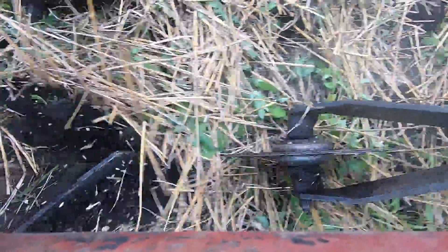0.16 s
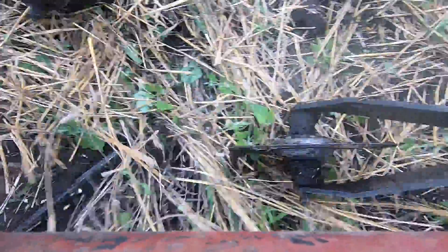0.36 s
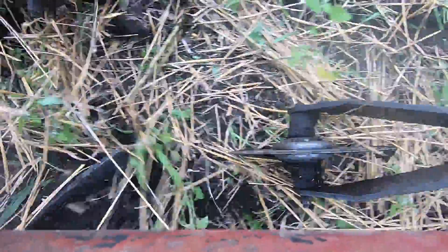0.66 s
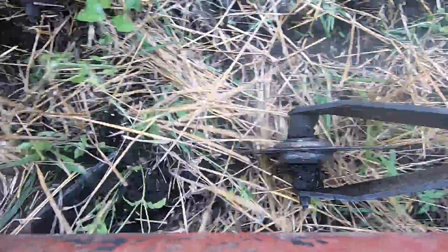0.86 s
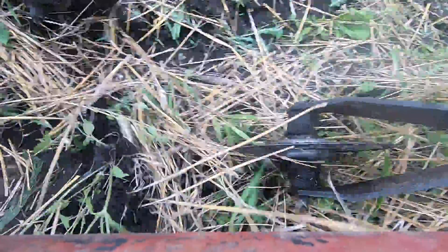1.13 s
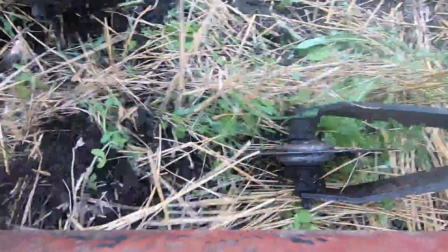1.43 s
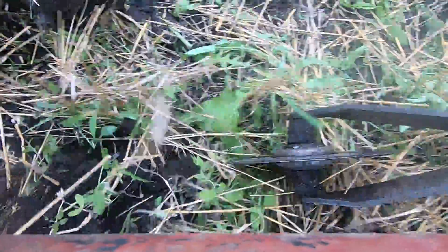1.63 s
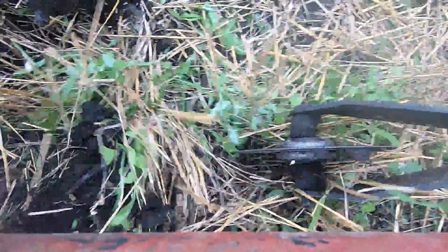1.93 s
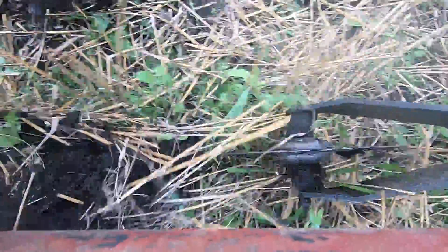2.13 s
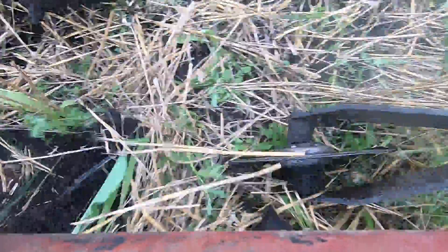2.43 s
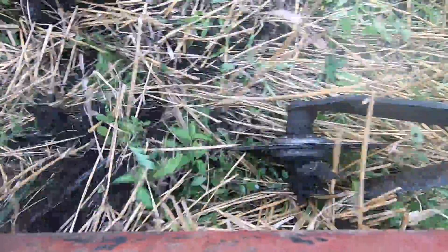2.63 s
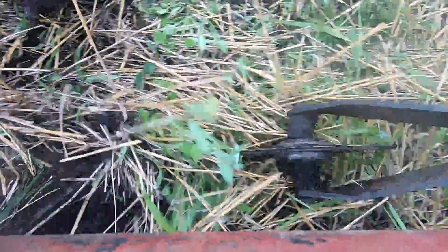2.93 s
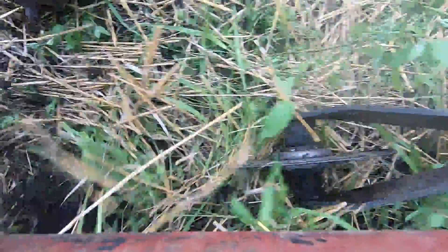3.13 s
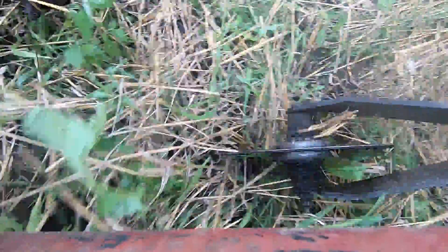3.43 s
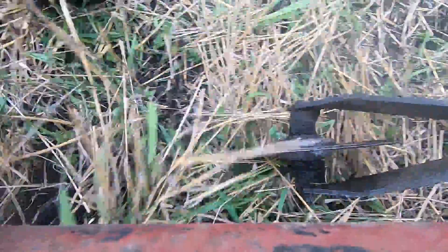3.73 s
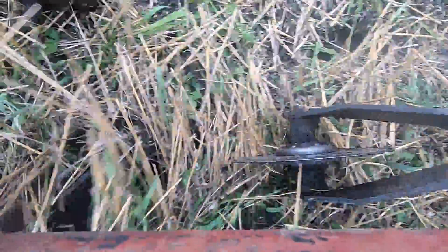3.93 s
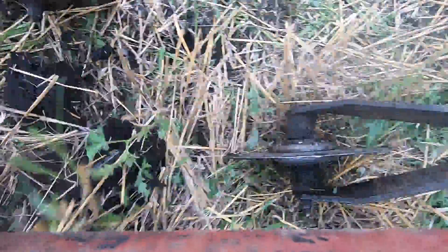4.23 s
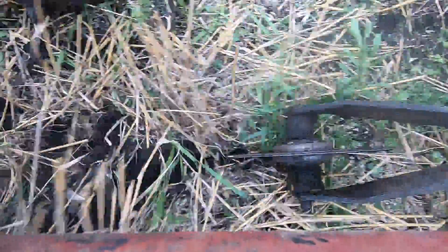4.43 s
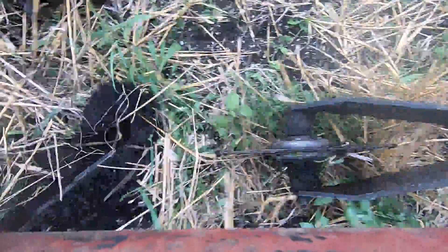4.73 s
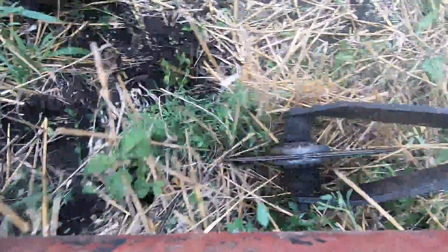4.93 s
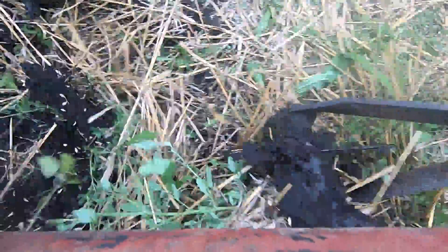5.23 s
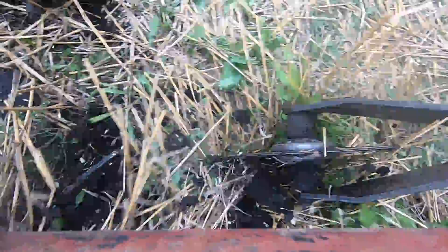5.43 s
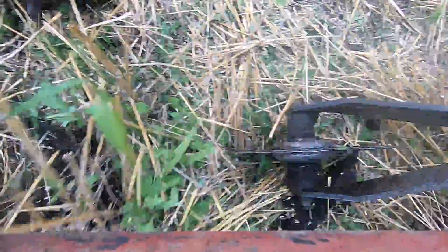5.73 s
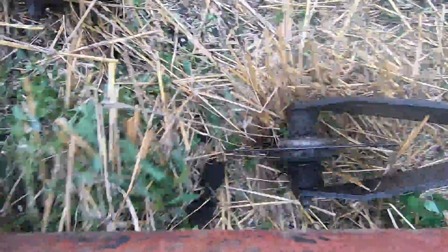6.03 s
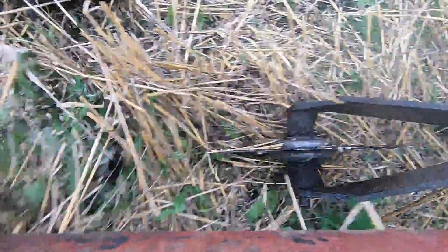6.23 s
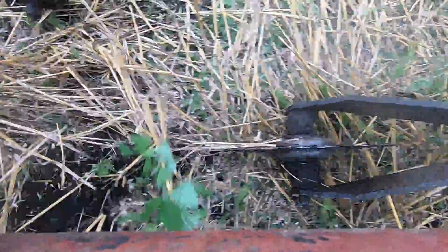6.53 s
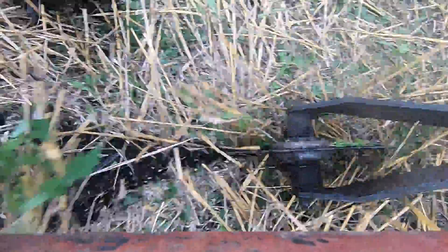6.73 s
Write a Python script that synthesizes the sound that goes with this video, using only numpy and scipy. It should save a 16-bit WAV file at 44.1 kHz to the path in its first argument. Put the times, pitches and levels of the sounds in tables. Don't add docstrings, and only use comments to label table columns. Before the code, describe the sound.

Outdoors in a stubble field, heard from right beside the plough disc: a loud low engine boom under load dominates, with rapid knocking and faint whine. Earth hisses and grinds past the share, roughest at the start and near the end. Metallic clod knocks come throughout, the strongest just before two seconds; dry stalks crack and tick, and dull stone thuds jolt the frame, hardest after five seconds.

```python
import sys
import numpy as np
from scipy import signal
from scipy.io import wavfile
from scipy.ndimage import uniform_filter1d, minimum_filter1d

SR = 44100
rng = np.random.default_rng(int(sys.argv[2]) if len(sys.argv) > 2 else 0)


def int16_out(signal):
    q = np.round(np.clip(np.atleast_2d(signal).T, -1, 1) * 32767)
    wavfile.write(sys.argv[1], SR, q.astype(np.int16))


def magnitude_from_level(level_db):
    exponent = np.asarray(level_db, float) / 20
    return 10 ** exponent


N = 302526
TIME = np.arange(N) / SR


def evened(x):
    return x / np.sqrt(np.mean(x ** 2) + 1e-20)


def curves(rows):
    s, *columns = np.transpose(rows)
    return [np.interp(TIME, s, c) for c in columns]


def bumps(rows):
    s, length, db = np.transpose(rows)[..., None]
    t = TIME[::128]
    shape = np.cos(np.pi * np.clip((t - s) / length, -.5, .5)) ** 2
    return np.interp(TIME, t, (db * shape).sum(0))


def read(points, hz):
    f, value = np.transpose(points)
    return np.interp(np.log(hz + 1), np.log(f + 1), value)


def resonate(x, hz, width):
    return signal.lfilter(*signal.iirpeak(hz, hz / width, SR), x)


def band(x, lo_hz, hi_hz):
    return signal.sosfilt(signal.butter(4, [lo_hz, hi_hz], "bandpass", fs=SR, output="sos"), x)


def drift(per_s):
    t = TIME[::128]
    hz = np.geomspace(per_s / 12, per_s, num=16)[:, None]
    waves = np.sin(2 * np.pi * (hz * t + rng.random(hz.shape))).sum(0)
    return np.interp(TIME, t, evened(waves))


def noise(colour, size, patchy_db, flicker_db):
    frames, hz = 4 * N // size + 5, np.fft.rfftfreq(size, 1 / SR)
    a, b, patches, flicker = rng.standard_normal((frames, len(hz), 4), np.float32).T
    patches = evened(uniform_filter1d(uniform_filter1d(patches, size=6, axis=0), size=16, axis=1))
    flicker = evened(uniform_filter1d(flicker, size=60, axis=0))
    level_db = read(colour, hz)[:, None] + patchy_db * patches + flicker_db * flicker
    z = (a + 1j * b) * magnitude_from_level(level_db)
    return evened(signal.istft(z, nperseg=size, noverlap=3 * size // 4)[1][:N])


def sparse_blows(per_s, spread_db):
    sizes = magnitude_from_level(spread_db * np.minimum(rng.exponential(1, N), 4))
    return sizes * (rng.random(N) < per_s / SR) * rng.choice([-1, 1], N)


# time in seconds, speed in rpm.
SPEED = [(0.0, 1678.8), (0.5, 1754.3), (0.95, 1704.8), (1.11, 1687.3), (1.53, 1692.5), (1.92, 1647.1),
         (2.36, 1633.2), (2.58, 1672.9), (3.05, 1683.1), (3.91, 1639.7), (4.22, 1656.7), (4.38, 1641.6),
         (4.92, 1594.8), (5.33, 1607.0), (5.69, 1630.2), (6.17, 1619.0), (6.34, 1609.5), (6.86, 1596.0)]


def engine_cycle():
    return .0063 + np.cumsum(curves(SPEED)[0] / 120) / SR


# strength in dB, lag from the manifold length in firing periods.
CYLINDERS = [(.6, -.011), (.8, -.037), (.6, -.029), (0, 0), (-1.3, .048), (-.9, .044)]
# multiple of the engine cycle, level in dB rms.
ORDER_DB = [(1, -57), (2, -51), (3, -79), (9, -38.5), (10, -36.5), (11, -40.5), (12, -47.5), (13, -43),
            (14, -50.5), (15, -49), (16, -69), (17, -46.5), (18, -49.5), (19, -74)]
# middle in seconds, length in seconds, change in dB.
SAGS = [
    (1.52, 0.44, -1.8),
    (2.08, 0.6, -1.6),
    (2.82, 0.71, -2),
    (5.42, .25, -1.5),
]


def exhaust(cycle):
    count = len(CYLINDERS)
    smooth = signal.resample(np.array(CYLINDERS), 32 * count).T
    strength_db, lag = (np.interp(cycle, np.arange(len(c)) / len(c), c, period=1) for c in smooth)
    boom_db = -13 + bumps(SAGS) + strength_db + 0.059 * drift(29)
    boom = magnitude_from_level(boom_db) * np.cos(2 * np.pi * (count * cycle + lag))
    orders = sum(magnitude_from_level(db) * np.cos(2 * np.pi * (k * cycle + rng.random())) for k, db in ORDER_DB)
    return np.sqrt(2) * (boom + magnitude_from_level(1.3 * drift(4.2)) * orders)


# place as a share of the cycle, level in dB.
KNOCKS = [(.035, 0), (.197, -10), (.357, -6.5), (.438, -9), (.596, -7.5), (.752, -16), (.826, -3.5),
          (.972, -6)]
# frequency in Hz, width in Hz, level in dB.
BLOCK = [(585.6, 95, -3), (633, 82, 0), (443, 44, -8.5)]


def block(cycle, bite_db):
    blows = np.zeros(N)
    chance = rng.standard_normal((int(cycle[-1]) + 1, len(KNOCKS), 2))
    for k, (place, db) in enumerate(KNOCKS):
        at = np.searchsorted(cycle, np.arange(len(chance)) + place + .0015 * chance[:, k, 0])
        blows[np.minimum(at, N - 1)] += magnitude_from_level(db + 1.4 * chance[:, k, 1])
    drive = evened(blows) + .18 * rng.standard_normal(N)
    ring = sum(magnitude_from_level(db) * resonate(resonate(drive, hz, w), hz, w) for hz, w, db in BLOCK)
    return magnitude_from_level(-34.5 + 0.77 * bite_db - 4.0) * evened(ring)


# multiple of the engine cycle, frequency in Hz of the panel it excites,
# width in Hz, level in dB on resonance.
GEARS = [(20.7, 277.3, 4.5, -43.5), (64.6, 941, 22, -46), (120, 1618, 55, -51), (112, 1540, 60, -60)]
# middle in seconds, length in seconds, change of whine in dB.
MESH = [
    (.58, 0.44, 3),
    (4.65, .35, -3.5),
    (5.0, .4, 3),
    (5.35, 0.91, -10),
    (5.9, 0.53, 3),
    (6.35, 0.51, 3),
    (6.85, .3, -4),
]


def gears(cycle):
    rate = np.gradient(cycle) * SR
    whine = 0
    for k, hz, width, db in GEARS:
        off_resonance = 1 + (2 * (k * rate - hz) / width) ** 2
        tone = np.sqrt(2) * np.cos(2 * np.pi * k * cycle)
        whine = whine + magnitude_from_level(db + 2.2 * drift(40)) * tone / off_resonance
    return magnitude_from_level(bumps(MESH)) * whine


# frequency in Hz, level in dB per Hz.
SHAKE = [(15, -26.5), (30, -21), (50, -6), (62, 5.5), (72, -4), (125, -4), (170, -33.5), (250, -46),
         (500, -100)]
# frequency in Hz, level in dB per Hz.
DRUMMING = [(50, -70), (100, -19), (150, -1), (200, -0.5), (250, 3.5), (300, -8), (370, -18.5),
            (600, -39.5), (1500, -89.5)]
# middle in seconds, length in seconds, change of drumming in dB.
LEANS = [
    (.6, 0.34, -11),
    (1.08, 0.35, -11.5),
    (1.68, 0.37, -13.5),
    (2.2, 0.51, 6.5),
    (2.8, .25, 2),
    (4.2, 0.99, -5),
    (5.05, 0.47, 2.5),
    (5.5, 0.8, 5.5),
    (6.3, 0.94, 6.5),
    (6.75, 0.35, 5.5),
]
# time in seconds, peak in dB, ring in Hz, treble in dB.
THUDS = [
    (1.401, -32, 213, 6),
    (1.864, -26, 223, 6.5),
    (2.628, -20.5, 193, -8),
    (3.487, -19.5, 206, -16),
    (3.925, -19.5, 238, -15),
    (5.305, -17.5, 260, -11),
    (5.381, -27, 250, 0),
    (5.406, -21.5, 240, -16),
    (6.068, -30.5, 180, -16),
]


def frame(bite_db):
    shake = noise(SHAKE, size=2048, patchy_db=1.2, flicker_db=1.2)
    drumming = noise(DRUMMING, size=1024, patchy_db=1.2, flicker_db=1.5)
    jolt_s = 0.051
    jolts = sum(magnitude_from_level(db) * np.exp(-abs(TIME - s) / jolt_s) for s, db, *_ in THUDS)
    shake_gain = magnitude_from_level(-30.5 + 2 * drift(2.8)) + magnitude_from_level(-10.5) * jolts
    drum_gain = magnitude_from_level(-37 + 0.75 * bite_db - 3.0 + bumps(LEANS)) + magnitude_from_level(-20) * jolts
    return shake_gain * shake + drum_gain * drumming


# frequency in Hz, level in dB per Hz.
ROAR = [(180, -48.5), (300, -10.5), (400, -12.5), (640, -8.5), (1050, -15.5), (1600, -14.5), (1870, -18.5),
        (3940, -22.5), (6570, -37.5), (7500, -34), (8500, -39), (11100, -51), (13100, -65.5), (15500, -84)]
# time in seconds, dB about the mean.
STUBBLE = [(0, -2), (.3, -1), (.45, 2), (1.4, -0.5), (2.05, 3), (2.3, 0), (2.55, 3), (3.2, 1.5), (3.4, 0.5),
           (3.8, 1.7), (4.2, -1), (4.4, -.6), (4.7, -0.5), (5.3, 3.5), (5.55, 2.5), (5.7, 1.5), (6.1, 3),
           (6.86, 0)]
# middle in seconds, length in seconds, lift of the fizz in dB.
BUNCHES = [(.1, .5, 8.5), (.37, .5, 14), (.73, .3, 4.5), (1.3, .5, 4), (4.15, 0.37, -0.5), (4.53, .2, 8.5),
           (5.0, .6, 9), (5.25, 0.45, 10.5), (6.05, 0.61, 7), (6.4, 0.55, 7), (6.75, 0.55, 9)]


def soil(bite_db):
    stubble_db = curves(STUBBLE)[0]
    rush = noise(ROAR, size=256, patchy_db=1.88, flicker_db=0.97)
    crumbs = signal.lfilter([1], [1, -.7], sparse_blows(per_s=500, spread_db=5.5))
    rush = rush + magnitude_from_level(-22.5) * evened(band(crumbs, 960, 5000))
    dull = signal.sosfiltfilt(signal.butter(2, 3000, fs=SR, output="sos"), rush)
    scrape = rush - dull
    fizz = evened(band(rng.standard_normal(N) * magnitude_from_level(1.9 * drift(60)), 11200, 14400))
    rush_db = -41 + .2 * bite_db + .4 * stubble_db + 1.5
    scrape_db = -46.5 + stubble_db + 8.5
    fizz_db = -81 + bumps(BUNCHES) + 2.0
    return magnitude_from_level(rush_db) * dull + magnitude_from_level(scrape_db) * scrape + magnitude_from_level(fizz_db) * fizz


# middle in seconds, length in seconds, lift in dB.
HEAVY = [
    (0, 0.51, 11.5),
    (.3, 0.54, 6),
    (3.88, .3, 6),
    (5.2, 1, 3),
    (5.6, 0.48, 4.5),
    (6.06, 0.72, 12),
    (6.75, 1, 8.5),
]


def share(bite_db):
    slips = sparse_blows(per_s=1500, spread_db=3.5)
    board = sum(resonate(resonate(slips, hz, 75), hz, 75) for hz in (538, 583))
    board = board + magnitude_from_level(-10) * band(slips, 690, 930)
    return magnitude_from_level(-44 + 0.81 * bite_db + bumps(HEAVY) - 2.0) * evened(board)


def hits(rows, ring_width, body_hz, treble_hz, rise_s, t60, lift_db, crack_db):
    out, t = np.zeros(N + 4096), np.arange(4096) / SR
    crack_t60 = 0.0059
    decay = magnitude_from_level(-60 * t / t60) + magnitude_from_level(crack_db - 60 * t / crack_t60)
    envelope = decay * (1 - np.exp(-t / rise_s))
    for s, db, hz, treble_db in rows:
        burst = rng.standard_normal(len(t)) * envelope
        mode = resonate(resonate(burst, hz, ring_width), hz, ring_width)
        low = evened(mode) + evened(band(burst, *body_hz))
        high = band(burst, *treble_hz)
        sound = low / abs(low).max() + magnitude_from_level(treble_db) * high / abs(high).max()
        out[round((s - rise_s) * SR):][:len(t)] += magnitude_from_level(db + lift_db) * sound
    return out[:N]


# time in seconds, peak in dB, ring in Hz, treble in dB.
CLANKS = [(0.179, -27, 1220, -33), (0.385, -23, 1310, -24), (0.4165, -24, 1520, -24),
          (0.562, -27.5, 910, 0), (0.852, -24, 1110, -20), (1.4068, -24.5, 1180, -26),
          (1.4398, -27.5, 1495, -11), (1.5727, -26.5, 1640, -25), (1.5938, -28.5, 1404, -6),
          (1.859, -21.5, 1410, -28), (1.912, -14.5, 1430, -22), (2.1849, -20.5, 1060, -18),
          (2.223, -26, 1980, -7), (2.3473, -23, 1350, -10), (2.488, -22, 1300, -9),
          (2.6306, -22.5, 1460, -16), (3.0546, -31, 1210, -9), (3.345, -25, 940, -26),
          (3.4876, -23.5, 1080, -24), (3.647, -23, 1300, -20), (3.9075, -22.5, 1480, -27),
          (3.949, -23, 1390, -14), (4.5511, -20, 1685, -7), (5.2908, -22, 1160, -16),
          (5.507, -30, 1170, -2), (5.7156, -29, 990, -17), (6.0432, -23.5, 1270, -13),
          (6.108, -27, 997, -10), (6.1613, -26.5, 1350, -19), (6.597, -30, 915, -23)]
# time in seconds, peak in dB, ring in Hz, treble in dB.
SCRAPES = [(0.487, -22, 920, -11), (1.478, -24, 3600, -8), (1.862, -24, 1250, -22),
           (1.902, -20.5, 1110, -15), (1.9656, -27, 1480, -19), (1.984, -26, 2200, -15),
           (1.999, -22, 1480, -11), (2.107, -30, 2100, -1), (3.405, -23, 1000, -22), (3.425, -26, 1750, -8),
           (4.9782, -26, 1100, -11), (5.2762, -22, 1270, -12), (5.281, -30, 1160, -5),
           (6.028, -33, 1060, 5)]


def clods():
    return (hits(CLANKS, 240, (600, 2800), (2600, 5500), .003, 0.059, -2.2, -3)
            + hits(SCRAPES, 550, (600, 2800), (2600, 5500), .005, 0.1, -4.8, -13))


# time in seconds, peak in dB, ring in Hz, treble in dB.
SNAPS = [(0.5601, -28, 4220, -10), (0.7362, -30, 3930, -15), (0.7552, -27, 3930, -15),
         (0.8395, -28.5, 4700, -23), (1.0141, -31, 4800, -15), (2.2209, -38, 3470, -23),
         (2.3136, -37, 3660, -16), (2.3445, -19, 3720, -15.5), (2.4867, -34, 3220, -23),
         (3.1946, -29.5, 3800, -25), (3.4236, -35.5, 3100, -7), (3.7274, -30, 3050, -24),
         (3.8477, -38, 3960, -4), (3.9459, -30, 4000, -24), (4.0357, -33, 4000, -18),
         (4.5191, -32, 3860, -16), (4.5516, -22, 3800, -4.5), (4.9182, -27.5, 3670, -10),
         (5.1173, -29, 4170, -13), (5.465, -29.5, 3560, -22), (5.6695, -31, 3700, -16),
         (5.7158, -23, 4620, -16), (6.0062, -27, 3220, -16)]
# time in seconds, peak in dB, ring in Hz, treble in dB.
TICKS = [
    (0.7624, -32, 3940, -19),
    (4.934, -26.5, 3640, -11),
    (5.7048, -23.5, 4280, -22),
    (5.849, -27, 4560, -6),
    (5.8612, -21, 4180, -11),
    (5.915, -33, 3000, -14),
    (6.1514, -29.5, 3800, -6),
    (6.1914, -32.5, 4190, -3),
]


def straw():
    return (hits(SNAPS, 390, (3000, 6000), (6800, 9800), 0.0004, 0.065, -2.8, 14)
            + hits(TICKS, 520, (3000, 6000), (6800, 8800), 0.00049, 0.04, -4.5, 9.6))


def stones():
    return hits(THUDS, 100, (150, 340), (420, 1100), .003, 0.078, -3.0, -9)


# time in seconds, dB about the mean pull.
BITE = [(0, 0), (.42, 4.5), (.56, -2), (1.25, 1.5), (1.7, -2), (1.9, 1), (2.1, -2), (3.0, -3), (3.4, 0.5),
        (4.1, -5.5), (4.45, 3.5), (5.25, 4.5), (5.5, -1), (5.8, 0), (6.08, -2.5), (6.3, -0.5), (6.86, 0.5)]


def scene():
    cycle = engine_cycle()
    bite_db = curves(BITE)[0]
    engine = exhaust(cycle) + block(cycle, bite_db) + gears(cycle)
    plough = frame(bite_db) + soil(bite_db) + share(bite_db)
    return (engine + plough + clods() + straw() + stones())[None]


def roll_off(x):
    return signal.sosfilt(signal.butter(12, 15710, fs=SR, output="sos"), x)


# frequency in Hz, width in Hz, lift in dB.
HOUSING = [(7750, 1300, 3), (8980, 350, -9), (9550, 500, 3), (10200, 600, -8), (10950, 700, 5)]


def record(dry):
    wet = dry + sum((magnitude_from_level(db) - 1) * resonate(dry, hz, w) for hz, w, db in HOUSING)
    room_left = np.minimum(magnitude_from_level(-6.7) / (abs(wet) + 1e-9), 1)
    gain = uniform_filter1d(minimum_filter1d(room_left, size=800), size=500)
    mix = gain * wet + .0019
    return roll_off(mix)


dry = scene()
out = record(dry)
int16_out(out)
```